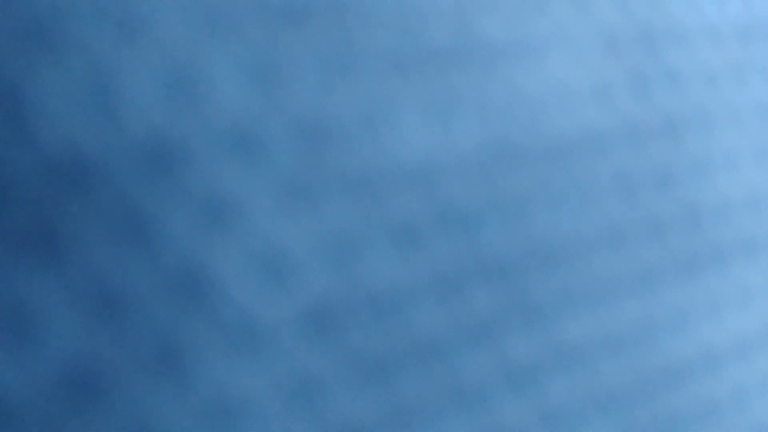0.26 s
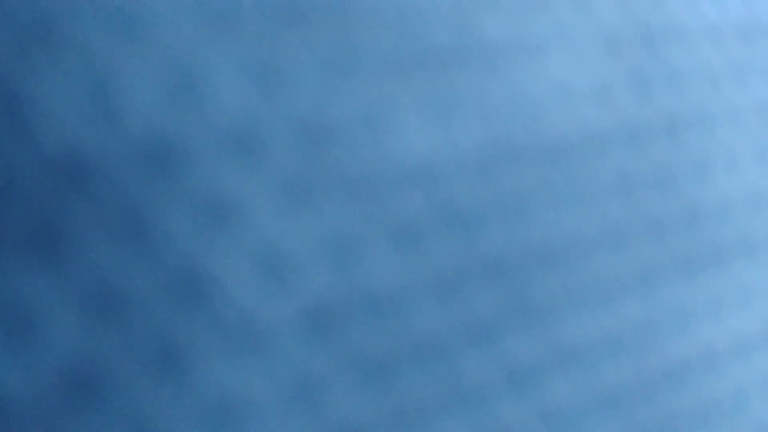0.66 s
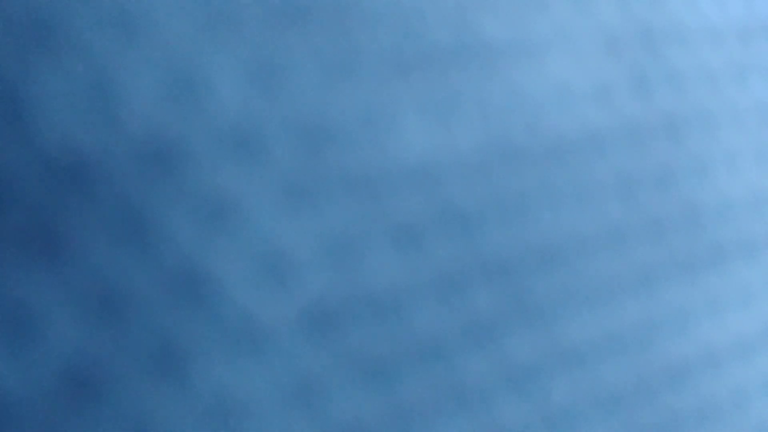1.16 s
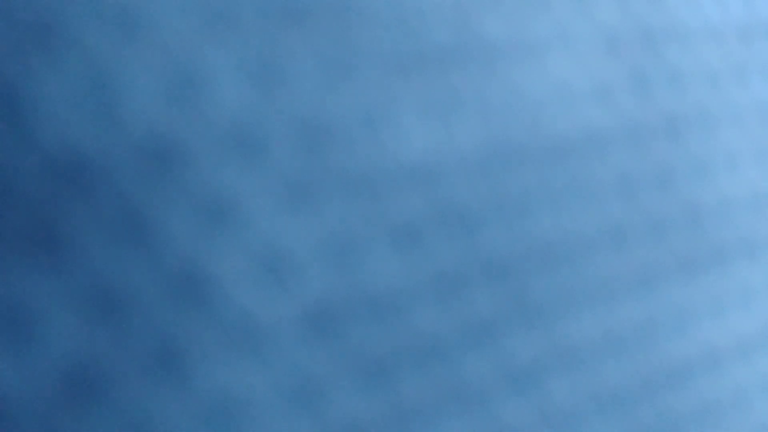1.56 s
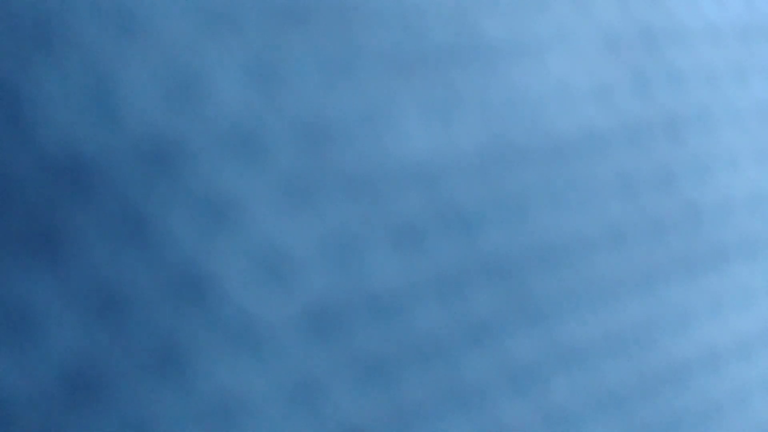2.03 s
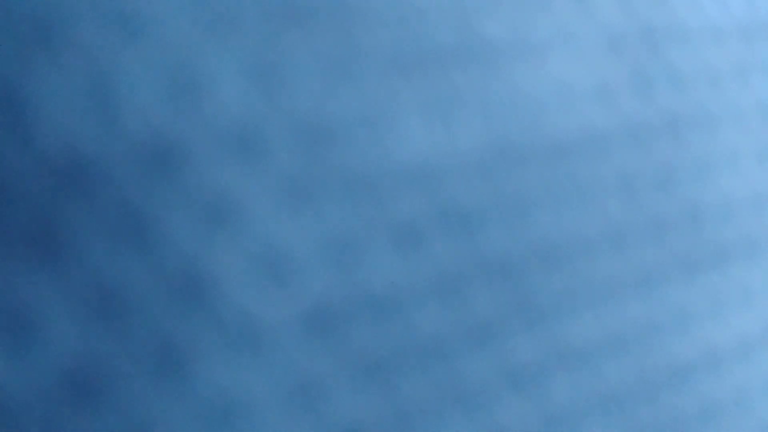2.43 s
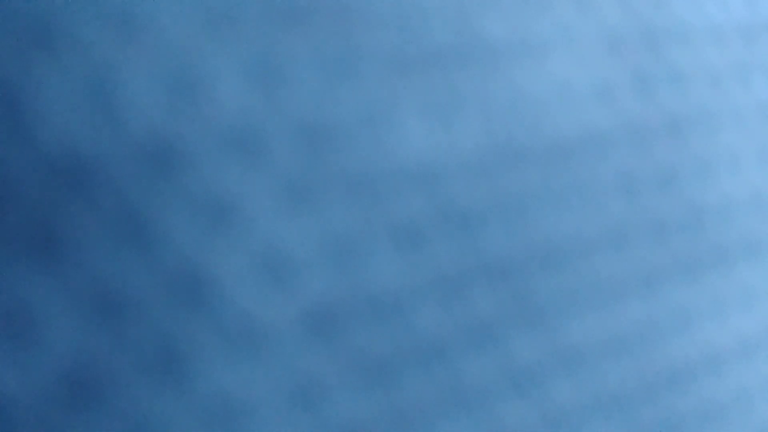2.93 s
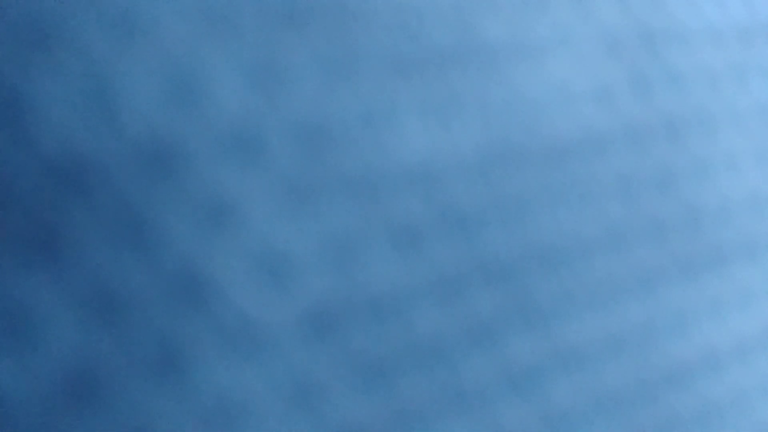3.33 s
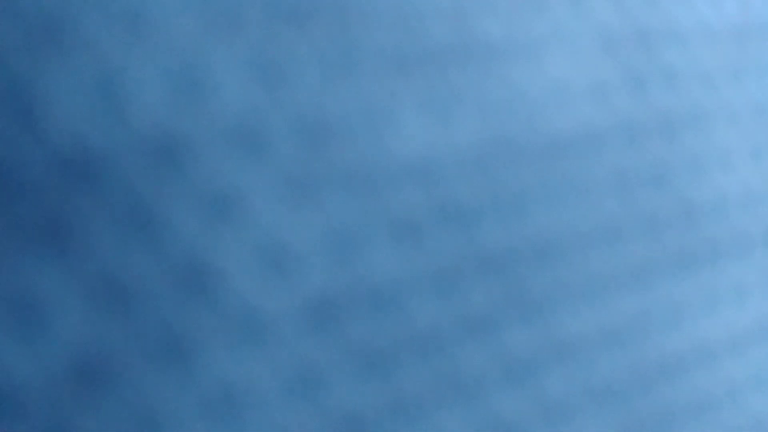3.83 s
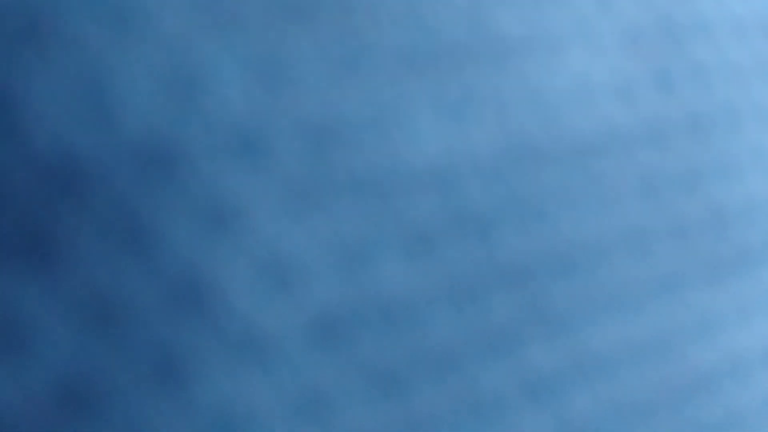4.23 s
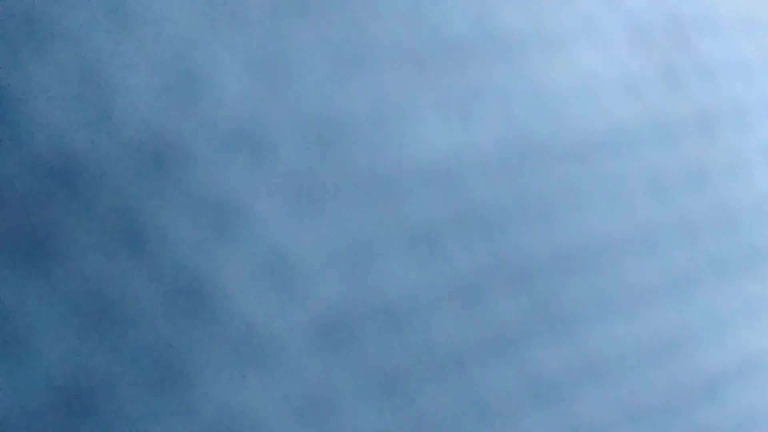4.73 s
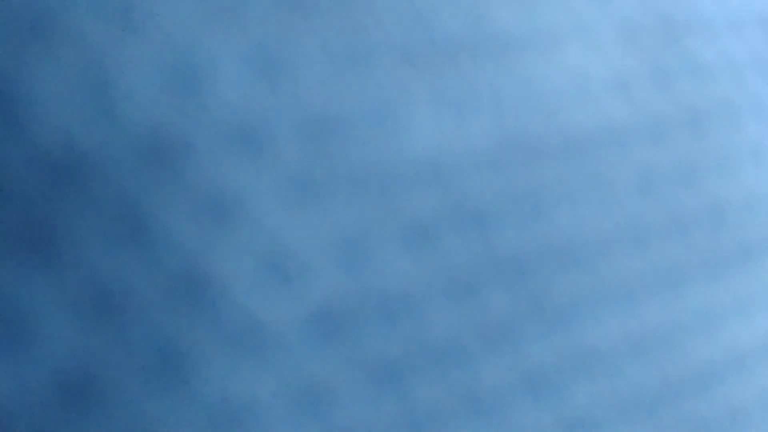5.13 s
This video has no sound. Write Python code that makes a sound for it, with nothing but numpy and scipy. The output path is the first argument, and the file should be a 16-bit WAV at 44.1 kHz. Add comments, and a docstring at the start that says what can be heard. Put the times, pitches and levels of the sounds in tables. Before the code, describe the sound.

Close, dry stereo sound of hands opening stiff plastic packaging in a quiet room. A low rumble and faint hiss run throughout. Almost nothing happens until about 0.5 s, when a short crumple gives a few sharp snaps and small pops. After a pause, isolated bright cracks come at 1.0 and 1.2 s, with thin finger slides between. From about 1.6 s the crackle gathers, becoming a dense, loud flurry of snaps and hollow pops from 2.0 to 2.45 s. Brief hard bursts follow near 2.65 and 2.87 s, then a lull around 3 s. A second dense run lasts from about 3.2 to 3.75 s. Handling then thins and moves right: lighter clicks around 4.0 to 4.15 s, then strong hollow pops and snaps from 4.36 to 4.6 s. After 4.75 s only soft sliding and tiny pops remain until the end, about 5.4 s.

```python
"""Hands crumple and pull open a stiff plastic package close to two microphones in a quiet room.
First come scattered pops and short crumples, then a dense run of bright snaps and hollow pops over crackle;
late on the hands move to the right and the handling thins out to faint pops.
Creases and film grains are noise puffs that set broad resonances ringing, with short reflections from close by.
A low rumble and faint hiss, both shaped noise, fill the gaps throughout."""
import sys
import numpy as np
from scipy import signal
from scipy.fft import rfft, irfft
from scipy.io import wavfile
from scipy.ndimage import uniform_filter1d

SR = 44100
rng = np.random.default_rng(int(sys.argv[2]) if len(sys.argv) > 2 else 0)


def wav_record(signal):
    """Record a signal, one row per channel, as 16-bit PCM in the file named by sys.argv[1]."""
    frames = np.transpose(np.atleast_2d(signal))
    bounded = np.clip(frames, -1, 1)
    # unit amplitude maps onto the largest positive 16-bit level
    quanta = np.round(bounded * 32767).astype(np.int16)
    wavfile.write(sys.argv[1], SR, quanta)


N = 236960

# creases buckling, snap and pop each with its own pitch; snaps ring at 6000 Hz at most:
# (time [s], snap level [dB], snap pitch [Hz], pop level [dB], pop pitch [Hz])
BUCKLES = [(0.246, -52, 2680, -42.5, 530), (0.3586, -51.5, 7800, -52, 570), (0.4949, -25, 2870, -23, 410),
           (0.5276, -33, 2600, -33.5, 660), (0.5818, -11, 2960, -26.5, 1240),
           (0.5855, -19, 6900, -27, 1370), (0.591, -13, 7600, -28.5, 1400), (0.6678, -50, 7000, -49, 400),
           (0.947, -56, 1700, -41, 590), (0.9845, -40.5, 5000, -42, 550), (1.0379, -11.5, 5000, -38.5, 970),
           (1.2002, -25, 5300, -36, 1060), (1.2078, -9.5, 4900, -12, 1190), (1.271, -37, 4300, -40, 577),
           (1.2889, -33, 5300, -33.5, 550), (1.2967, -27.5, 4900, -39, 1070),
           (1.3898, -25, 3800, -33, 1080), (1.395, -24.5, 2400, -24, 1060), (1.601, -12, 5600, -25, 603),
           (1.6552, -46, 2500, -24.5, 715), (1.6704, -19, 5200, -30, 810), (1.686, -23, 5900, -28.5, 1210),
           (1.7665, -35, 6700, -19.5, 810), (1.7711, -20.5, 5900, -18, 810), (1.8434, -23, 5200, -28, 740),
           (1.853, -13, 3700, -24, 1230), (1.8601, -20, 2900, -20.5, 606), (1.9035, -12, 5000, -32, 890),
           (1.9329, -7.5, 5300, -31, 556), (1.962, -21, 4900, -35.5, 530), (1.9994, -40, 1700, -33.5, 970),
           (2.0203, -32, 2200, -27.5, 550), (2.045, -25, 2100, -23.5, 1030),
           (2.0498, -5, 4800, -32.5, 1230), (2.1178, -21, 2900, -25, 1400),
           (2.1282, -20.5, 5700, -25, 1170), (2.136, -13.5, 2300, -23.5, 1250),
           (2.1419, -7.5, 5900, -31.5, 1280), (2.145, -2, 4700, -23.5, 840), (2.1545, -3, 4800, -15.5, 860),
           (2.1686, -12.5, 2400, -22, 840), (2.1776, -28, 1900, -27.5, 690),
           (2.1827, -11, 7000, -19.5, 1400), (2.1954, -7.5, 1700, -11, 620),
           (2.2004, -22.5, 1900, -16.5, 840), (2.2134, -7, 5000, -20, 1230),
           (2.2243, -11.5, 2200, -22.5, 1400), (2.2361, -9.5, 4900, -25, 1400),
           (2.2411, -13, 4700, -26, 740), (2.2545, -34, 4700, -20, 860), (2.2708, -23, 5300, -27.5, 760),
           (2.2812, -21, 4200, -25.5, 1000), (2.3249, -6.5, 4500, -15.5, 890),
           (2.3648, -25.5, 5200, -23.5, 580), (2.3801, -26, 5400, -32, 380), (2.3967, -17, 5000, -20, 1090),
           (2.4024, -6.5, 6200, -18, 537), (2.4313, -34, 3200, -30, 880), (2.4773, -40, 4100, -34, 740),
           (2.5059, -29, 2700, -31.5, 830), (2.5532, -27.5, 2900, -45, 378),
           (2.6021, -24, 3800, -32.5, 745), (2.6319, -10.5, 3000, -23, 1100),
           (2.6395, -4, 4300, -19.5, 1070), (2.664, -6.5, 3000, -19.5, 1080),
           (2.6717, -18.5, 2800, -26, 1300), (2.7623, -12.5, 4900, -27.5, 1000),
           (2.7864, -26, 3800, -26.5, 790), (2.811, -33, 3100, -30.5, 1140),
           (2.8635, -4, 4800, -18.5, 1050), (2.8682, -7, 7800, -27, 970), (2.916, -37.5, 3700, -38.5, 510),
           (2.9353, -38, 3800, -40, 950), (3.0205, -44, 2700, -40, 480), (3.055, -44.5, 2500, -39.5, 380),
           (3.1854, -8, 2600, -14.5, 970), (3.2182, -3, 5600, -21.5, 980), (3.2348, -17.5, 2600, -23, 1120),
           (3.2407, -9, 2600, -27, 1080), (3.2443, -15, 3300, -18.5, 950),
           (3.2622, -8.5, 5400, -14.5, 1110), (3.3317, -16, 3200, -22.5, 1090),
           (3.3364, -27.5, 1720, -19.5, 1130), (3.3541, -16, 2700, -23, 920),
           (3.4134, -5, 5200, -26.5, 800), (3.4443, -10, 5300, -9.5, 590), (3.4706, -18, 1800, -21.5, 1050),
           (3.477, -14, 1700, -16, 1050), (3.4881, -6, 2800, -17, 1220), (3.512, -15, 2700, -24.5, 1230),
           (3.5204, -15.5, 5000, -22, 1230), (3.5814, -20.5, 4000, -23.5, 1210),
           (3.5888, -19, 5200, -29.5, 1320), (3.621, -12, 4500, -17.5, 1190),
           (3.6358, -33, 1700, -19.5, 1400), (3.6427, -16.5, 5600, -19, 1350),
           (3.6504, -23.5, 1900, -27, 1400), (3.6538, -16, 5600, -11, 1410),
           (3.6825, -16, 5300, -27.5, 1250), (3.6911, -10.5, 2900, -16.5, 1400),
           (3.7077, -11, 2700, -20.5, 1420), (3.7219, -13.5, 2900, -23, 1420),
           (3.7282, -10.5, 2800, -27.5, 1140), (3.7355, -13.5, 2800, -27, 1380),
           (3.8974, -27, 2700, -57, 1370), (3.9571, -26.5, 4700, -33, 1430),
           (4.0239, -25.5, 2100, -23.5, 1370), (4.0576, -30, 2900, -23.5, 620),
           (4.1128, -33, 4400, -31, 750), (4.1442, -20, 7600, -32, 1400),
           (4.1538, -23.5, 5400, -23.5, 1135), (4.3586, -35.5, 4000, -24, 410),
           (4.3709, -7, 4400, -21, 550), (4.3771, -31, 5000, -17, 442), (4.3993, -21, 5400, -32, 750),
           (4.4566, -8.5, 4170, -11, 830), (4.4874, -33, 1700, -24.5, 460), (4.5042, -49, 1700, -27, 466),
           (4.542, -29, 4530, -28, 380), (4.552, -14.5, 4660, -12, 573), (4.569, -21, 4750, -9.5, 730),
           (4.612, -26.5, 7300, -24.5, 500), (4.6796, -36, 1700, -21, 540), (4.7474, -53, 1700, -33, 625),
           (5.138, -51, 1700, -43, 580), (5.2421, -48.5, 1710, -37.5, 610), (5.3064, -56.5, 7800, -48, 583),
           (5.3361, -40, 7170, -44, 380)]
# the film being worked, one row a crumple:
# (start [s], length [s], level [dB], change to the end [dB], brightness [dB])
CRUMPLES = [(0.478, .06, -41, -6.5, 4.5), (0.574, 0.044, -36, -6, 3.5), (1.029, 0.048, -37, -12, 4),
            (1.087, 0.14, -61.5, -5.5, 12), (1.197, 0.035, -32.5, -5, 7), (1.259, 0.058, -45.5, 2, 4.5),
            (1.383, 0.035, -36.5, -7, -1), (1.588, 0.12, -37, -1, -1), (1.737, 0.1, -52.5, 15, 3),
            (1.847, 0.11, -33.5, 2.2, -0.5), (1.976, 0.063, -37.5, -12, -4.5), (2.055, 0.076, -42.5, 0, -1),
            (2.114, .1, -28, -0.5, 1), (2.215, 0.19, -26.5, -14, -3.5), (2.384, 0.052, -40.5, 1.5, 7.5),
            (2.464, 0.15, -47, 13.5, -1.5), (2.634, 0.044, -25, -3.5, 5.5), (2.75, 0.092, -41, -11.5, -3.7),
            (2.853, 0.051, -31, -17.5, 10.5), (2.904, 0.12, -55.5, -14, -5.5), (3.016, 0.086, -52, -7, -4),
            (3.112, 0.051, -57.5, 11, -2), (3.173, 0.11, -24.5, -1.1, -0.9), (3.299, 0.09, -44, -5, 0.5),
            (3.404, 0.22, -27, -5.5, 4.5), (3.621, .15, -26.5, -4.5, 3), (3.804, 0.14, -45.5, 7, 1.8),
            (3.935, 0.039, -36, -8.5, 1.5), (4.036, .03, -40.5, -4, -3), (4.056, 0.087, -41, -3.5, 4),
            (4.361, 0.035, -39.5, 1.5, -6), (4.45, 0.025, -36.5, -9, -20), (4.538, 0.033, -25.5, -2, 0),
            (4.592, 0.053, -44, -10, 0), (4.658, 0.051, -50.5, -3, 2.5)]
# where the hands are: (time [s], left minus right [dB])
HANDS = [(0, -1.5), (1.4, -3), (1.9, 0.1), (3.5, 1.8), (3.75, -1), (3.9, -6.5), (4.15, -9), (4.45, -11.5),
         (4.7, -12), (5.37, -9.5)]
LAG_PER_DB = 4e-5  # s by which the far microphone hears later, per dB of level lean


def gain_of(db):
    """Turns decibels into an amplitude factor."""
    return 10 ** (np.asarray(db) / 20)


def evened(x):
    """Scales a sound to an RMS of 1."""
    return x / np.sqrt(np.mean(x ** 2) + 1e-20)


def read(points, hz):
    """Reads a curve of (frequency, value) points along a logarithmic frequency axis."""
    f, value = np.transpose(points)
    return np.interp(np.log(hz + 1), np.log(f + 1), value)


def stroke(start, length, level_db, change_db):
    """Envelope of one hand movement: quick attack, a steady swell or fade, quick release."""
    attack_s, release_db_per_s = 0.011, 902.5
    t = np.arange(N) / SR - start
    course_db = level_db + change_db * np.clip(t / length, 0, 1)
    course_db -= release_db_per_s * np.maximum(t - length, 0)
    return np.clip(t / attack_s, 0, 1) ** 2 * gain_of(course_db)


def add(mix, s, pan_db, sound):
    """Places a sound between the microphones: weaker and later on the far side."""
    for channel, side in zip(mix, (1, -1)):
        lag_s = max(-side * pan_db, 0) * LAG_PER_DB
        part = channel[round((s + lag_s) * SR):][:len(sound)]
        gain = np.sqrt(2 / (1 + gain_of(-2 * side * pan_db)))  # equal total power
        part += gain * sound[:len(part)]


def burst(noise, hz, octaves, t60, rise):
    """A dying puff of noise that sets a broad, steep-sided resonance ringing; level 1 over its strongest 2 ms."""
    t, f = np.arange(len(noise)) / SR, np.fft.rfftfreq(len(noise), 1 / SR)
    puff = noise * gain_of(-60 * t / t60) * np.minimum(t / rise, 1)
    resonance = 1 / (1 + 1j * (f / hz - hz / (f + 1)) / octaves)
    ringing = irfft(rfft(puff) * resonance ** 2, len(noise))
    return ringing / np.sqrt(uniform_filter1d(ringing ** 2, size=90).max())


def grains(lo_hz, hi_hz, per_s, spread_db, t60, count=9):
    """Small creases ticking at random times and pitches, most tiny and a few large."""
    struck = rng.random(N) < per_s / SR
    size = gain_of(spread_db * np.minimum(rng.exponential(1, N), 4)) * struck
    kind, noise = rng.integers(0, count, N), rng.standard_normal((count, 512))
    pitches = np.geomspace(lo_hz, hi_hz, count)
    shapes = [burst(n, hz, octaves=1.0, t60=t60, rise=0.000077) for n, hz in zip(noise, pitches)]
    return evened(sum(signal.oaconvolve(size * (kind == k), shape)[:N] for k, shape in enumerate(shapes)))


def hiss(colour, size):
    """Shaped noise from random short-time spectra, alike in both channels in the bass only."""
    likeness = [(60, 0.82), (240, 0.86), (950, 0.37), (3770, 0.053), (15000, 0.04)]  # how alike the channels are: (frequency [Hz], left-right likeness [0-1])
    tilt = [(60, -4), (240, -2.5), (950, -3.5), (3770, 0), (15000, -4.5)]  # level balance: (frequency [Hz], left minus right [dB])
    frames, hz = 4 * N // size + 5, np.fft.rfftfreq(size, 1 / SR)
    a, b, c, d = rng.standard_normal((frames, len(hz), 4)).T
    same = np.clip(read(likeness, hz), -1, 1)[:, None]
    lean = gain_of(read(tilt, hz) / 2)[:, None]
    left, other = a + 1j * b, c + 1j * d
    right = same * left + np.sqrt(1 - same ** 2) * other
    spectra = np.array([left * lean, right / lean]) * gain_of(read(colour, hz))[:, None]
    return evened(signal.istft(spectra, nperseg=size, noverlap=3 * size // 4)[1][:, :N])


def room_air():
    """Steady soft noise of the quiet room."""
    air_colour = [(88, -34.5), (150, -1.5), (314, -3), (430, -8.5), (560, -4.5), (728, -16), (900, -22),
                  (1200, -32), (3000, -36), (5000, -60)]  # spectrum of the room air: (frequency [Hz], relative level [dB per Hz])
    return gain_of(-50.5) * hiss(air_colour, size=1024)


def rumble():
    """Low noise that swells under the crumples and jolts with each pop."""
    # spectrum of the rumble: (frequency [Hz], relative level [dB per Hz])
    rumble_colour = [(18, -38.5), (30, -8), (65, -3.5), (118, -2), (135, -15), (189, -31.5), (300, -11),
                     (390, -40.5), (660, -120)]
    rest_db, stir_db, jolt_db = -43.5, -9, -16  # at rest, against the crumples, against the pops
    jolt_rise_s, jolt_t60 = 0.025, 0.31  # s
    jolts, t = np.zeros(N), np.arange(SR // 2) / SR
    for s, _, _, pop_db, _ in BUCKLES:
        jolts[round(s * SR)] += gain_of(2 * (pop_db + jolt_db))  # as power
    jolt_shape = np.minimum(t / jolt_rise_s, 1) * gain_of(-2 * 60 * t / jolt_t60)
    jolts = signal.oaconvolve(jolts, jolt_shape)[:N]
    stir = gain_of(stir_db) * sum(stroke(*row[:-1]) for row in CRUMPLES)
    level = np.sqrt(abs(gain_of(2 * rest_db) + stir ** 2 + jolts))
    return level * hiss(rumble_colour, size=2048)


def slides():
    """Fingers slide softly on the film: a thin, high whisper of very fine grains, unrelated left and right."""
    # slides between the bursts: (start [s], length [s], level [dB], change to the end [dB])
    finger_slides = [(0.389, 0.12, -61, -4.5), (0.792, 0.15, -61.5, -10), (.94, 0.027, -54, -11),
                     (1.43, 0.068, -58.5, -7), (1.498, 0.16, -57.5, -1), (4.168, 0.18, -67.5, -1),
                     (4.753, 0.15, -73, 10), (4.903, 0.35, -66, -4)]
    level = sum(stroke(*row) for row in finger_slides)
    whisper = [grains(3800, 13300, per_s=1700, spread_db=1.5, t60=0.0035, count=4) for _ in range(2)]
    balance = gain_of([[-1.5], [1.5]])  # a little stronger on the right
    return uniform_filter1d(level, size=400) * balance * whisper


def rustle():
    """Crackle, fizz and a hollower rattle follow the working of the film, from where the hands are."""
    fizz_db, hollow_db = -3.5, -4.5  # against the crackle, at brightness 0 dB
    at = np.arange(N)
    level = [stroke(*row[:-1]) for row in CRUMPLES]
    bright_db = np.transpose(CRUMPLES)[-1][:, None]
    crackle = grains(1700, 6800, per_s=1500, spread_db=4.0, t60=0.0062)
    fizz = grains(6000, 12000, per_s=2600, spread_db=3.2, t60=.005)
    hollow = grains(450, 1500, per_s=450, spread_db=5.0, t60=0.017)
    film = np.sum(level, axis=0) * crackle
    film += np.sum(gain_of(fizz_db + bright_db) * level, axis=0) * fizz
    film += np.sum(gain_of(hollow_db - bright_db) * level, axis=0) * hollow
    pan_db = 0.71 * np.interp(at / SR, *np.transpose(HANDS))  # the film leans less than the hands
    sides = []
    for side in (1, -1):
        lag = np.maximum(-side * pan_db, 0) * LAG_PER_DB * SR  # samples
        sides.append(gain_of(side * pan_db / 2) * np.interp(at - lag, at, film))
    return np.array(sides)


def buckles():
    """Each crease gives a sharp snap with a thin bright edge and a shudder, the package wall a slower pop and push."""
    edge_base_db, edge_db_per_octave, edge_full_hz = -5.5, 14, 7600  # higher snaps have a stronger bright edge
    shudder_s, shudder_spread = 0.026, 0.57  # typical t60 [s] and its random spread (natural log)
    scatter_db = 2.5  # each crease lies a little to one side of the hands
    out, chance = np.zeros((2, N)), rng.standard_normal((len(BUCKLES), 6, 1536))
    for (s, snap_db, snap_hz, pop_db, pop_hz), noise in zip(BUCKLES, chance):
        t60 = shudder_s * np.exp(shudder_spread * noise[-1, 0])
        pan_db = np.interp(s, *np.transpose(HANDS)) + scatter_db * noise[-1, 1]
        edge_db = edge_base_db + edge_db_per_octave * np.log2(snap_hz / edge_full_hz)
        hz = min(snap_hz, 6000)
        snap = burst(noise[0], hz, octaves=.55, t60=.004, rise=.0001)
        shudder = gain_of(-10.5) * burst(noise[4], hz, octaves=1.0, t60=t60, rise=0.0022)
        edge = gain_of(edge_db) * burst(noise[1], 8000, octaves=0.9, t60=t60, rise=0.00025)
        pop = burst(noise[2], pop_hz, octaves=0.75, t60=0.022, rise=0.00085)
        push = gain_of(-9) * burst(noise[3], 190, octaves=1.17, t60=.045, rise=0.0036)
        crease = gain_of(snap_db) * (snap + shudder + edge)
        wall = gain_of(pop_db) * (pop + push)
        add(out, s, pan_db, crease + wall)
    return out


def reflections(x):
    """Sparse random-sign taps die ever faster, band by band; three sets fade in and out in turn at a steady rate."""
    nearby = [(200, 0.082), (700, 0.088), (2000, 0.054), (5000, 0.069), (12000, 0.054)]  # decay off the table and walls close by: (frequency [Hz], t60 [s])
    # reflected sound, long waves reach both microphones alike: (frequency [Hz], left-right likeness [0-1])
    echo_likeness = [(100, 0.68), (600, 1), (1300, 0.092), (4000, .03)]
    turn, out = np.pi * 5.3 * np.arange(N) / SR, np.zeros((2, N))  # keeps the echo colour changing
    heard = .85 * x + .3 * x[::-1]  # each side also catches some of the other
    for k in range(3):
        taps = np.zeros((3, 6000))  # left, right and shared
        at = np.arange(40, 5980, 12) + rng.integers(0, 12, (3, 495))
        np.put_along_axis(taps, at, rng.choice([-1., 1.], at.shape), 1)
        hz, t, z = signal.stft(taps, SR, nperseg=128)
        same = np.clip(read(echo_likeness, hz), 0, 1)[:, None]
        z = np.sqrt(same) * z[2] + np.sqrt(1 - same) * z[:2]
        decay = gain_of(-60 * (t / read(nearby, hz)[:, None]) ** 1.41)
        tail = signal.istft(z * decay, SR, nperseg=128)[1]
        share = np.sqrt(2 / 3) * np.cos(turn + k * np.pi / 3)  # the three shares keep a steady total power
        out += signal.oaconvolve(heard * share, tail / np.linalg.norm(tail[0]), axes=1)[:, :N]
    return out


def scene():
    """Layers the room, the finger slides and the package with its reflections."""
    room = rumble() + room_air()
    package = rustle() + buckles()
    echo_db = -9  # reflected sound against the direct
    return room + slides() + package + gain_of(echo_db) * reflections(package)


def record(dry):
    """Microphone colour with a peak near 8 kHz, its own hiss, overload on the loudest snaps, then the band limit."""
    # response of the two microphones: (frequency [Hz], left [dB], right [dB])
    response = [(19.26, -20, -25), (44.7, -5.5, -6.5), (80.3, 0.5, -0.5), (1290, -0.5, 2), (2400, 1, 1),
                (7020, 0, 2), (7600, -0.5, 9.5), (8964, -13.5, -1.5), (10940, -27.5, -24.5),
                (12000, -10, -9.5), (14540, -16.5, -4)]
    # spectrum of the microphone hiss: (frequency [Hz], relative level [dB per Hz])
    self_noise = [(500, -0.5), (1000, 3), (2500, -2), (8000, -1.5), (10500, -10.5), (14000, -2)]
    hz, (f, *sides_db) = abs(np.fft.fftfreq(8192, 1 / SR)), np.transpose(response)
    log_gain = np.log(gain_of([read(np.transpose([f, db]), hz) for db in sides_db]))
    causal = np.exp(log_gain - 1j * signal.hilbert(log_gain).imag)  # minimum phase: no ringing ahead of a snap
    taps = np.fft.ifft(causal).real[:, :4096]
    coloured = signal.oaconvolve(dry, taps, axes=1)[:, :N]
    coloured += gain_of(-69) * hiss(self_noise, size=1024)
    held = np.clip(1.16 * np.tanh(coloured / 1.14), -.97, .97)  # soft overload, then a hard ceiling
    low_pass = signal.firwin(511, 15800, window=("kaiser", 9), fs=SR)  # Hz
    return signal.oaconvolve(held, low_pass[None], "same")


dry = scene()
out = record(dry)
wav_record(out)
```